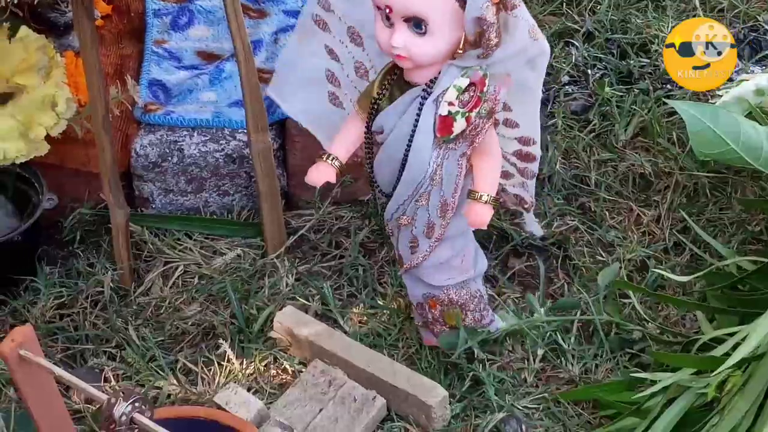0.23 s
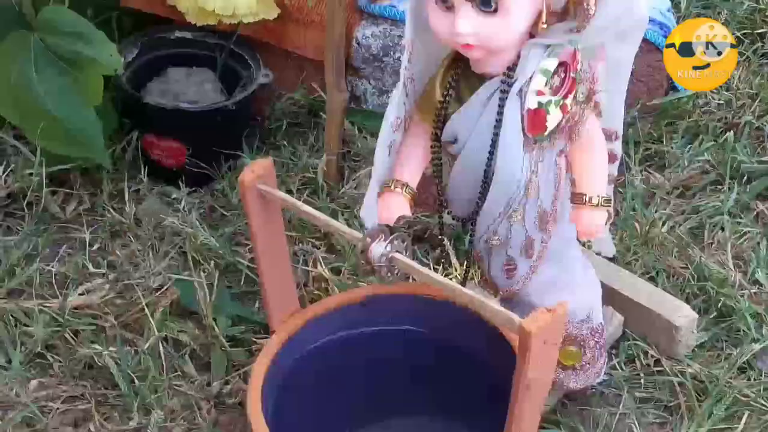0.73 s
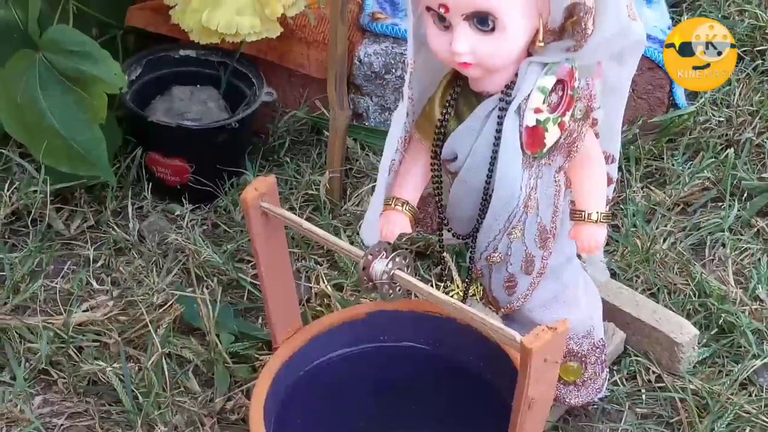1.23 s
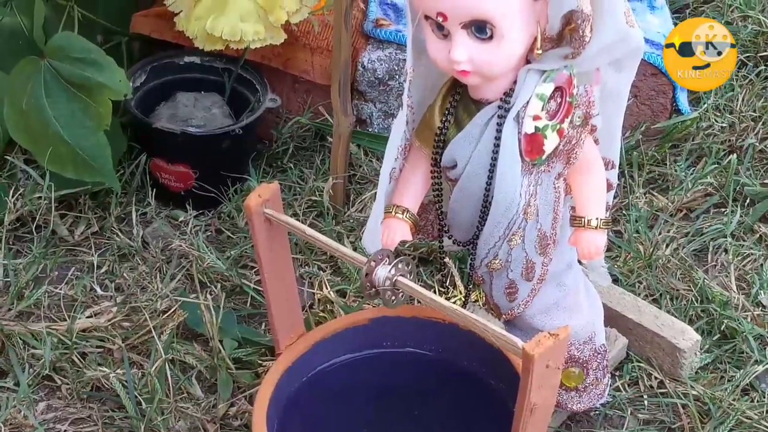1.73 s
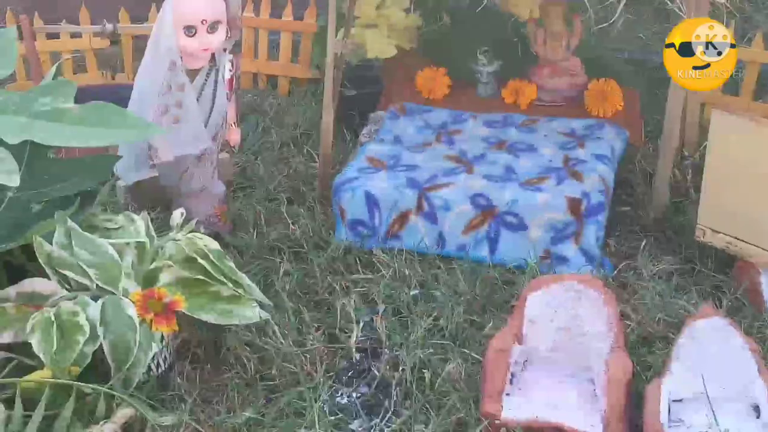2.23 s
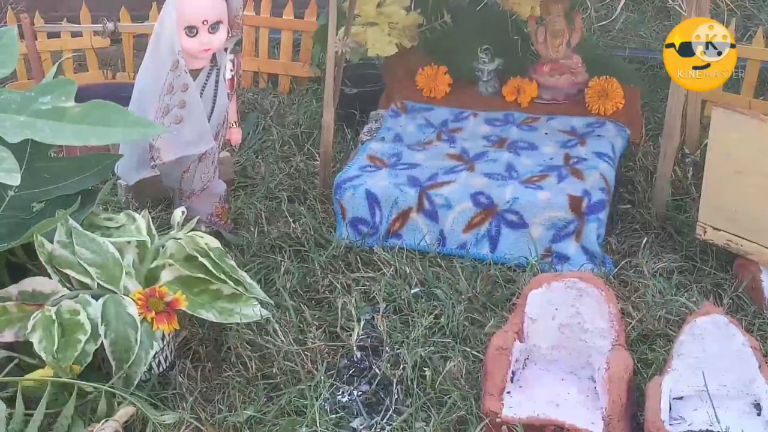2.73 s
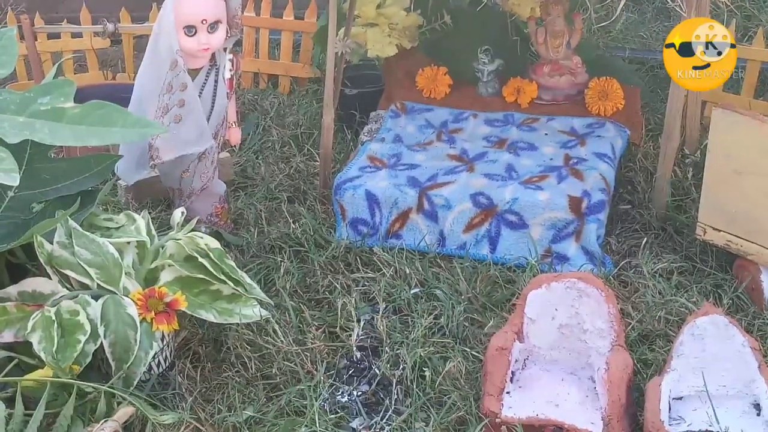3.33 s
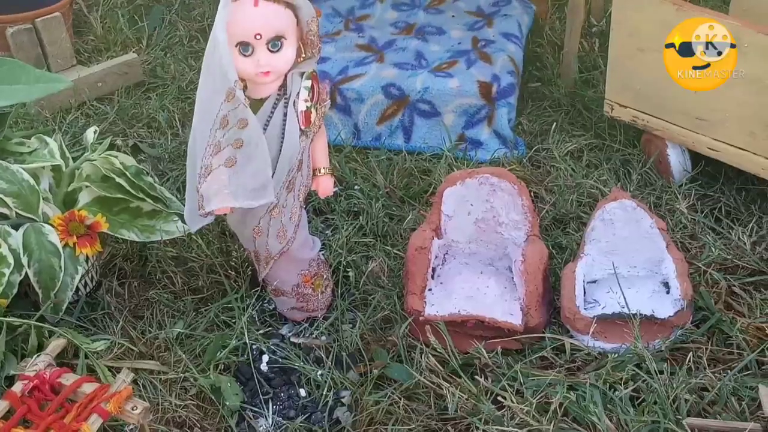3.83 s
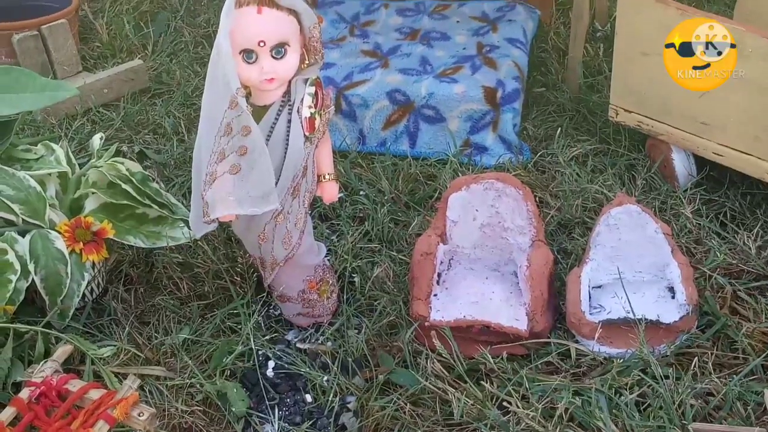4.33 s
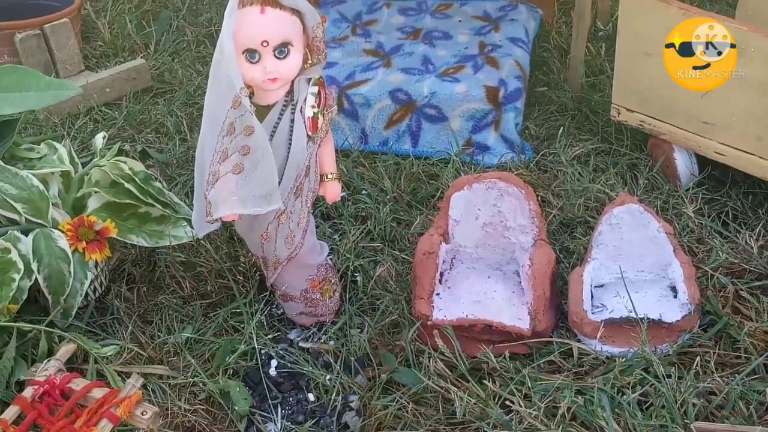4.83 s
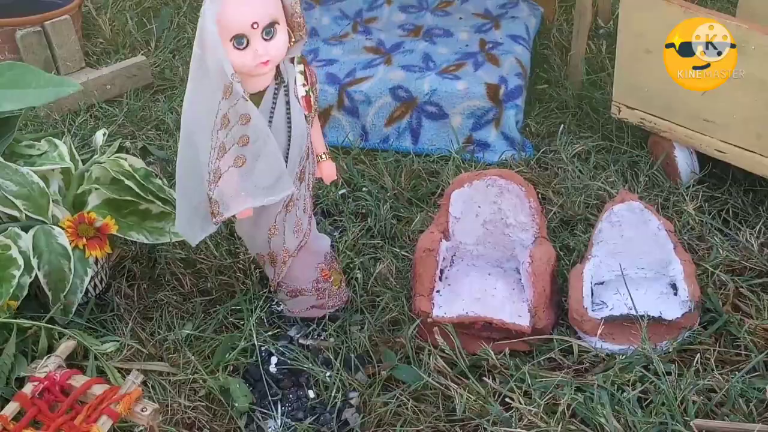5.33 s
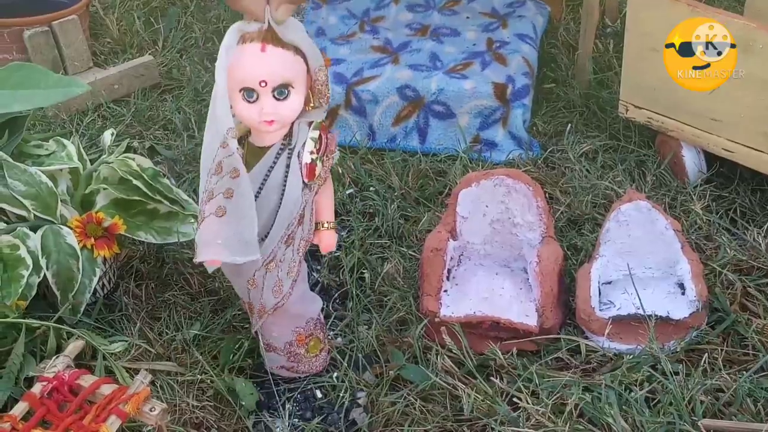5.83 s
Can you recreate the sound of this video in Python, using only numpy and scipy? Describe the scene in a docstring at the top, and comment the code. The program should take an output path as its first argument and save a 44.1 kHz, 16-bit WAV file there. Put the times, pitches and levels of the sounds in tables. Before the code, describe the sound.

A small stiff broom sweeps rough, gritty ground, close, dry and centred. At 0 seconds a pull is already dragging and fading, with faint hiss beneath. A crisp push lands at 0.35, a pull at 1.0, and a push at 1.6. A clipped pull at 2.3 is followed by a second pull at 2.7, with a tiny swell of hiss just before it. Pushes at 3.4 and 4.65 alternate with firmer pulls at 4.0 and 5.3. Each stroke begins with a short scrunch and slight hollow, woody rattle, then becomes a scratchy rasp lasting up to about half a second, dotted with fine ticks as bristles catch and spring free. Quiet still air and a low wavering hum continue throughout. At about 5.7 the last pull stops and the steady hiss drops away; a very faint hiss swells near 5.9.

```python
"""A small stiff broom is pulled and pushed over rough ground at a mostly steady pace, heard for six seconds.
Still air, a faint hiss and a low hum lie underneath, and a pull is already dragging as the sound begins.
Each later stroke lands with a scrunch, contacts ringing the bundle's resonances, then drags as filtered grit;
single bristles catch and snap free as ticks. Pull follows push, but for two pulls in a row after two seconds.
As the last pull ends the steady hiss drops out, and one last faint swell of hiss follows."""
import sys
import numpy as np
from scipy import signal
from scipy.fft import rfft, irfft
from scipy.io import wavfile

SR = 44100
rng = np.random.default_rng(int(sys.argv[2]) if len(sys.argv) > 2 else 0)


def digitize_waveform(pressure):
    """Quantize a signal to 16-bit integers and store it at the path in sys.argv[1].

    Rows of a 2-D input are taken as channels; values are limited to [-1, 1].
    """
    field = np.atleast_2d(pressure).T
    bounded = np.clip(field, -1, 1)
    quanta = np.round(bounded * 32767).astype(np.int16)
    wavfile.write(sys.argv[1], SR, quanta)


N = 268083  # length in samples

LEAD_S = .02  # contact opens this long before a landing; catches stop this long before the stroke ends

# Strokes away from the body and back; levels are relative, the tilt colours the landing only:
# start_s, landing_db, drag_db, length_s, catch_lag_s, landing_tilt_db_per_octave, knock_pitch_hz
PUSH_STROKES = [(.350, 0.5, -0.5, 0.41, 0, 2.2, 607), (1.627, 1.5, 0, 1, 0.0036, 0.35, 606),
                (3.376, 2.5, 0.5, .6, -.001, 0.1, 566), (4.655, 2.5, 3, 0.51, -0.0015, -0.05, 580)]
PULL_STROKES = [(-.298, 3, 3, 0.73, 0, 0, 480), (.982, 3.5, 3.5, 0.51, 0.0004, 0.31, 519),
                (2.262, 1, -0.5, .12, 0, 0.3, 467), (2.729, 2, 3, 0.56, 0.00051, .31, 453),
                (4.006, 5, 3.5, .56, .004, -0.12, 467), (5.285, 5.5, 0.5, 0.39, 0.0043, -0.01, 450)]
# Forces of a landing (tips strike, bundle follows, settles); rise and fall are times per 60 dB:
# after_landing_s, rise_s, hold_s, fall_s, bundle_force_db, grit_force_db
PUSH_FORCES = [(.002, 0.01, 0.0033, 0.046, -20, -22.5), (0.019, .04, 0.0023, 0.026, -25, -22.5),
               (0.031, .05, .012, .25, -42, -47)]
PULL_FORCES = [(0.0005, .003, 0.0015, 0.042, -25.5, -24), (.01, 0.027, 0.012, 0.042, -28.5, -30),
               (0.036, .05, 0.032, .11, -43.5, -54)]
# Resonances of the bundle, bent one way or the other, relative levels: pitch_hz, width_hz, level_db
PUSH_RESONANCES = [(510, 70, -5), (690, 40, -4), (850, 35, -9), (1119, 45, -1), (1215, 35, -7),
                   (1728, 20, -4), (1954, 40, -1), (2659, 45, -2), (3030, 50, -9), (3176, 25, -6),
                   (3353, 40, -8), (3601, 25, -5), (3784, 35, -2), (3924, 70, 0), (4285, 70, -4),
                   (5071, 80, -3), (5528, 60, -5), (5695, 38, 3), (6524, 35, -7), (6971, 40, -15),
                   (8800, 400, -19)]
PULL_RESONANCES = [(520, 70, -3), (620, 60, -7), (720, 25, 0), (787, 28, 2), (1033, 35, -6), (1120, 40, -3),
                   (1216, 40, -2), (1300, 35, -3), (1372, 35, 0), (1715, 40, -3), (1911, 35, 0),
                   (1965, 35, 0), (2400, 50, -7), (2960, 40, -8), (3229, 55, -1), (3880, 45, -12),
                   (5017, 40, -15), (5313, 80, -20), (6325, 90, -20), (8350, 150, -32)]
# Spectral density of the crunching grit, relative: frequency_hz, density_db_per_hz
PUSH_CRUNCH_COLOUR = [(60, -31), (280, 18), (500, -16.5), (1100, 10), (1600, -12), (2300, 1), (3800, 17),
                      (5800, 16), (7800, -16.5), (9300, -2.5), (10400, -8.5), (11500, -37)]
PULL_CRUNCH_COLOUR = [(60, -22), (300, -27), (430, -2.5), (1300, 13.5), (2100, 6), (3400, 7.5),
                      (4400, -28.5), (6800, -3), (7700, -29.5), (8700, -10), (11000, -45)]


def landing(strokes, phases, modes, crunch, ring_db, knock_db, crunch_db, per_s, spread_db, clump_db,
            size=8192):
    """Impact excitation: a burst of contacts drives the bundle's resonances and crunches the grit."""
    out = np.zeros(N + size)
    ground = clumps(clump_db, per_s=300)
    bundle_force, grit_force = gestures(np.arange(size) / SR - LEAD_S, phases)
    for start_s, strength_db, *_, tilt_db, knock_hz in strokes:
        start = int((start_s - LEAD_S) * SR)
        if start < 0:  # landed before the sound begins
            continue
        contacts = ground[start:start + size] * grit(per_s, spread_db, size=size)

        def through(force, body):
            return rms_one(signal.fftconvolve(force * contacts, body)[:size])

        def blow(force):
            return from_db(strength_db) * np.sqrt(np.mean(force ** 2))

        # one low resonance, the knock, moves with the bend
        ringing = np.zeros(size)
        for hz, width, db in [(knock_hz, 70, knock_db), *modes]:
            # each resonance takes a set share of the blow's energy
            share = from_db(db + tilt_db * np.log2(hz)) * np.sqrt(width)
            ringing += share * through(bundle_force, bundle([(hz, width, 0)]))
        tilted = [(hz, db + tilt_db * np.log2(hz)) for hz, db in crunch]
        crunching = through(grit_force, response(tilted))
        stroke = blow(bundle_force) * from_db(ring_db) * rms_one(ringing)
        stroke += blow(grit_force) * from_db(crunch_db) * crunching
        out[start:start + size] += stroke
    return out[:N]


# Drag of a push (graze, press easing off, glide, closing flick, lift) and of a pull (press easing off,
# scuff, glide, closing flick, soft brush, lift); levels are relative, rise and fall are times per 60 dB:
# after_landing_s, rise_s, hold_s, fall_s, dull_rub_db, bright_rasp_db
PUSH_DRAG_GESTURES = [(-.011, .004, .002, 0.012, -41.5, -50), (.033, .05, .005, .55, -41, -43.5),
                      (.115, 0.11, 0.12, 0.57, -52, -52.5), (.292, .09, .012, .17, -46.5, -38),
                      (0.344, .2, .04, 1.3, -69.5, -69)]
PULL_DRAG_GESTURES = [(0.018, 0.037, 0.0054, 0.27, -37.5, -43.5), (0.118, 0.021, 0.0089, 0.079, -54.5, -45),
                      (.14, .08, 0.042, 0.51, -63, -51), (0.199, .1, 0.013, 0.14, -67, -45),
                      (.305, .12, 0.023, 0.23, -54.5, -59.5), (.36, 0.27, 0.12, 0.51, -71.5, -67.5)]
# Spectral density of the rubbing bundle and of the rasping tips, relative: frequency_hz, density_db_per_hz
RUB_COLOUR = [(100, -57.5), (330, -17.5), (500, -7), (730, 4), (870, -3), (1150, -2), (1400, -4),
              (1580, -17), (1950, -9), (2400, -16.5), (4000, -39), (9000, -75)]
RASP_COLOUR = [(300, -36.5), (900, -10), (1400, -4.5), (2000, -2.5), (2400, -7.5), (3200, 1), (3900, 3),
               (4600, 0), (5750, 0.5), (6100, -21), (7000, -10), (7700, -30.5), (9700, -24), (11000, -76.5)]


def drag(strokes, phases, modes, tilt_db, ring_db, per_s, spread_db, clump_db, twang_db, twang_t60,
         size=2048):
    """Sliding friction: the bundle rubs dully, its tips rasp over grit; tilt_db is per octave of rasp."""
    rub_gain, rasp_gain = along(strokes, phases)
    ground = clumps(clump_db, per_s=220)
    contacts = rms_one(ground * grit(per_s, spread_db))
    # many bristles of unequal length ring briefly after each contact
    twang = rng.standard_normal(size) * from_db(-60 * np.arange(size) / SR / twang_t60)
    twanging = rms_one(signal.fftconvolve(contacts, twang)[:N])
    contacts = contacts + from_db(twang_db) * twanging
    tilted = [(hz, db + tilt_db * np.log2(hz / 1000)) for hz, db in RASP_COLOUR]
    ring = bundle(modes)

    def with_ring(x):
        """Parallel paths: part of the sound passes through the bundle's resonances."""
        ringing = rms_one(signal.fftconvolve(x, ring)[:N])
        return rms_one(x + from_db(ring_db) * ringing)

    rasp = with_ring(colour(contacts, tilted))
    rub = with_ring(colour(ground * grit(3000, 3.9), RUB_COLOUR))
    return rub_gain * rub + rasp_gain * rasp


# Bumps that catch a tuft on every stroke; the peak is relative to the stroke's drag level:
# after_landing_s, peak_db, freeing_time_s
PUSH_BUMPS = [(.118, -28.5, 0.007), (.163, -31, 0.00305), (.194, -25.5, 0.0054), (.263, -25.5, 0.0062),
              (.288, -18, .012), (.389, -44, 0.0035)]
PULL_BUMPS = [(.119, -26, .006), (0.127, -24, .008), (.157, -35, .004), (.189, -17, 0.01),
              (0.208, -23.5, 0.005), (0.218, -25.5, .005), (.389, -34, 0.00185), (.44, -35, .004),
              (.486, -41, .005)]
TUFT_LOSS_DB, TUFT_SPREAD_DB = 12.5, 5.5  # the bristles that follow the first are weaker and uneven
CATCH_JITTER_S = 0.00037


def releases(strokes, catches, count):
    """Stick and slip: at each bump one bristle springs free, then a few weaker ones; rows (s, peak dB)."""
    rows = []
    for start_s, _, drag_db, length_s, lag_s, *_ in strokes:
        for after_s, peak_db, lasts_s in catches:
            first_s = start_s + lag_s + after_s + CATCH_JITTER_S * rng.standard_normal()
            delays_s = lasts_s * (np.arange(count) + rng.uniform(.5, 1, count)) / count
            losses_db = TUFT_LOSS_DB + TUFT_SPREAD_DB * rng.uniform(-0.89, 1, count)
            if after_s < length_s - LEAD_S and first_s > 0:
                level_db = peak_db + drag_db
                rows += [(first_s, level_db), *zip(first_s + delays_s, level_db - losses_db)]
    return rows


# Spectral density of the tick of a freed bristle, relative: frequency_hz, density_db_per_hz
SNAP_COLOUR = [(200, -22.5), (700, -8), (1500, 0), (3000, 3.5), (4500, 5.5), (5700, 2.5), (6400, -18),
               (7600, -25.5), (10000, -45), (11500, -44)]


def snaps(freed, ping_db, ping_width_hz, body_db, body_t60, size=512):
    """Sudden release of strain: a sharp tick, a ping at a random pitch and a very short noisy ring."""
    clicks, ticks = np.zeros(N), np.zeros(N)
    tick = response(SNAP_COLOUR)[:size]
    for (s, db), pitch in zip(freed, rng.random(len(freed))):
        at = int(s * SR)
        ping_hz = 1500 * 3.5 ** pitch
        ping = from_db(ping_db) * bundle([(ping_hz, ping_width_hz, 0)], size=size)
        snap = tick + np.convolve(tick, ping)[:size]
        ticks[at:at + size] += from_db(db) * snap / np.max(np.abs(snap))
        clicks[at] += from_db(db)
    decay = from_db(-60 / (body_t60 * SR))  # gain per sample
    dying = signal.lfilter([1], [1, -decay], clicks + 1e-18)
    body = np.zeros(N)
    for spectrum in (RUB_COLOUR, RASP_COLOUR):
        path = response(spectrum)
        noise = dying * rng.standard_normal(N)
        body += signal.fftconvolve(noise, path / np.linalg.norm(path))[:N]
    return ticks + from_db(body_db) * body


# Spectral density of the still air and of the hiss, relative: frequency_hz, density_db_per_hz
AIR_COLOUR = [(25, -19.5), (60, -7.5), (78, -13.5), (105, -11), (140, -5.5), (215, -5.5), (400, -9.5),
              (650, -16), (1100, -24.5), (1900, -13.5), (2800, -27.5), (5400, -26.5), (8000, -39.5),
              (11000, -43.5), (15500, -43)]
HISS_COLOUR = [(200, -24.5), (700, 12), (2000, 3), (2800, -7), (5800, 0), (7000, -9), (8000, -26.5),
               (11000, -40)]
# Swells of the hiss, rise and fall are times per 60 dB: start_s, rise_s, hold_s, fall_s, level_db
SWELLS = [(0, .01, .02, 3.2, -52.5), (2.694, .05, .03, .15, -58.5), (5.88, .03, .2, .3, -63.5)]
AIR_DB, HISS_DB, HUM_DB = -64.5, -68, -67
HUM_HZ = 103.4
HISS_PAUSE_S = (5.68, 6.6)  # the steady hiss is silent between these times


def background():
    """Filtered random noise: broad bands give still air and hiss, narrow ones a wavering low hum."""
    t = np.arange(N) / SR
    air = from_db(AIR_DB) * colour(rng.standard_normal(N), AIR_COLOUR)
    steady = from_db(HISS_DB) * ((t < HISS_PAUSE_S[0]) | (t > HISS_PAUSE_S[1]))
    swells, = gestures(t, SWELLS)
    hiss = np.hypot(steady, swells) * colour(rng.standard_normal(N), HISS_COLOUR)
    resonances = bundle([(HUM_HZ, 10, 0), (178, 16, -5)])
    hum = rms_one(signal.fftconvolve(rng.standard_normal(N), resonances)[:N])
    return air + hiss + from_db(HUM_DB) * hum


def from_db(db):
    """Logarithmic level: decibels to amplitude gain."""
    return 10 ** (np.asarray(db) / 20)


def rms_one(x):
    """Power normalisation: scale to unit mean square."""
    return x / np.sqrt(np.mean(x ** 2) + 1e-20)


def response(spectrum, size=4096):
    """Minimum phase: the causal impulse response of a colour, found by folding its cepstrum."""
    hz, db = np.transpose(spectrum)
    grid = np.maximum(np.fft.rfftfreq(size, 1 / SR), 1)
    gain = from_db(np.interp(np.log(grid), np.log(hz), db))
    cepstrum = irfft(np.log(gain))
    cepstrum[1:size // 2] *= 2
    cepstrum[size // 2 + 1:] = 0
    return irfft(np.exp(rfft(cepstrum)))


def colour(x, spectrum):
    """Linear filtering: give a steady signal a colour at unit power."""
    return rms_one(signal.fftconvolve(x, response(spectrum))[:N])


def grit(per_s, spread_db, size=N):
    """Shot noise: tiny contacts at random moments, with uneven sizes and signs; unit power."""
    scatter = np.clip(rng.standard_normal(size), -2, 2)
    sizes = from_db(spread_db * scatter) * rng.choice([-1, 1], size)
    return rms_one(sizes * (rng.random(size) < per_s / SR))


def bundle(modes, size=8192):
    """Modal superposition: parallel damped resonances, each building up over a few cycles; unit energy."""
    t = np.arange(size) / SR
    ring = np.zeros(size)
    for hz, width, db in modes:
        envelope = (1 - np.exp(-hz * t / 2)) * np.exp(-np.pi * width * t)
        ring += from_db(db) * width * envelope * np.cos(2 * np.pi * hz * t)
    return ring / np.sqrt(np.sum(ring ** 2))


def clumps(depth_db, per_s):
    """Surface roughness: uneven ground as a gain that wanders many times a second; unit power."""
    t = np.arange(N) / SR
    bumps = np.clip(rng.standard_normal(N // 20), -2, 2)
    return rms_one(from_db(depth_db * np.interp(t * per_s, np.arange(len(bumps)), bumps)))


def gestures(t, rows):
    """Power summation: attack, hold and release of each row; one gain curve per level column."""
    power = 0
    for at, rise, hold, fall, *levels_db in rows:
        away = np.maximum((at - t) / rise, (t - at - hold) / fall)
        shape_db = -60 * np.clip(away, 0, 2)
        power = power + from_db(np.add.outer(levels_db, shape_db)) ** 2
    return np.sqrt(power)


def along(strokes, rows):
    """Periodic forcing: the same gestures in every stroke while contact lasts; gains of rub and rasp."""
    t = np.arange(N) / SR
    gains = np.zeros((2, N))
    for start_s, _, drag_db, length_s, *_ in strokes:
        on = (t > start_s - LEAD_S) & (t < start_s + length_s)
        gains[:, on] += from_db(drag_db) * gestures(t[on] - start_s, rows)
    return gains


def low_pass(x, hz):
    """Elliptic filtering: a steep cut above the given frequency."""
    return signal.sosfilt(signal.ellip(10, .1, 80, hz, fs=SR, output="sos"), x + 1e-18)


def scene():
    """Superposition: landings, drags and snaps of both strokes over the background, alike in both channels."""
    push = landing(PUSH_STROKES, PUSH_FORCES, PUSH_RESONANCES, PUSH_CRUNCH_COLOUR, ring_db=-3.5,
                   knock_db=4.5, crunch_db=-7.0, per_s=5000, spread_db=-0.5, clump_db=4)
    pull = landing(PULL_STROKES, PULL_FORCES, PULL_RESONANCES, PULL_CRUNCH_COLOUR, ring_db=-4.0,
                   knock_db=-2.5, crunch_db=-13.0, per_s=2500, spread_db=3.5, clump_db=3.0)
    push += drag(PUSH_STROKES, PUSH_DRAG_GESTURES, PUSH_RESONANCES, tilt_db=1.0, ring_db=-26,
                 per_s=1800, spread_db=3.0, clump_db=4.5, twang_db=-6, twang_t60=0.12)
    pull += drag(PULL_STROKES, PULL_DRAG_GESTURES, PULL_RESONANCES, tilt_db=-3.0, ring_db=-14,
                 per_s=1800, spread_db=2.5, clump_db=4, twang_db=-2.5, twang_t60=0.08)
    push_freed = releases(PUSH_STROKES, PUSH_BUMPS, count=3)
    pull_freed = releases(PULL_STROKES, PULL_BUMPS, count=2)
    push += snaps(push_freed, ping_db=-19, ping_width_hz=450, body_db=-19, body_t60=0.0098)
    pull += snaps(pull_freed, ping_db=-11.5, ping_width_hz=730, body_db=-26, body_t60=0.0077)
    # so small a broom radiates little bass
    high_pass = signal.butter(3, 340, "high", fs=SR, output="sos")
    broom = signal.sosfilt(high_pass, push + pull + 1e-18)
    mono = low_pass(broom, 10400) + background()
    return np.array([mono, mono])


def record(dry):
    """Band limiting: the top is cut steeply above 15.5 kHz."""
    return low_pass(dry, 15500)


dry = scene()
out = record(dry)
digitize_waveform(out)
```